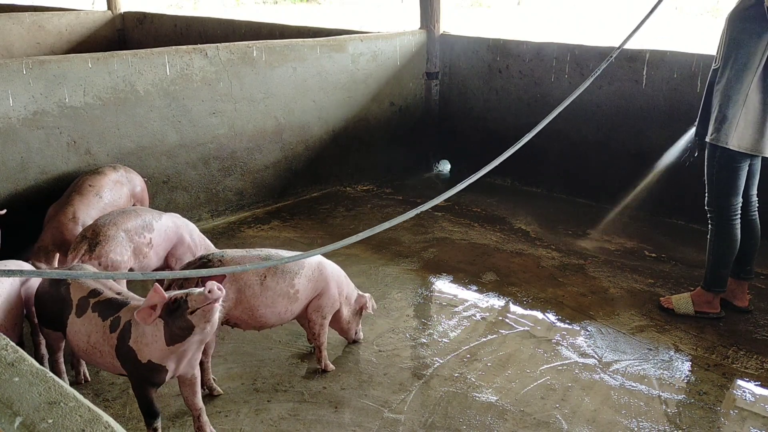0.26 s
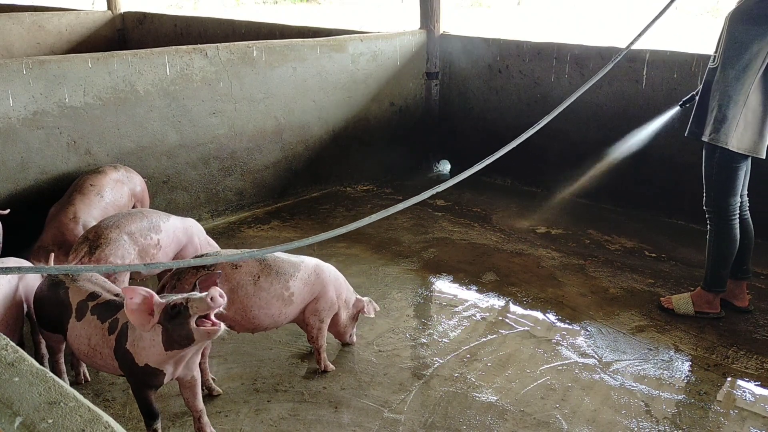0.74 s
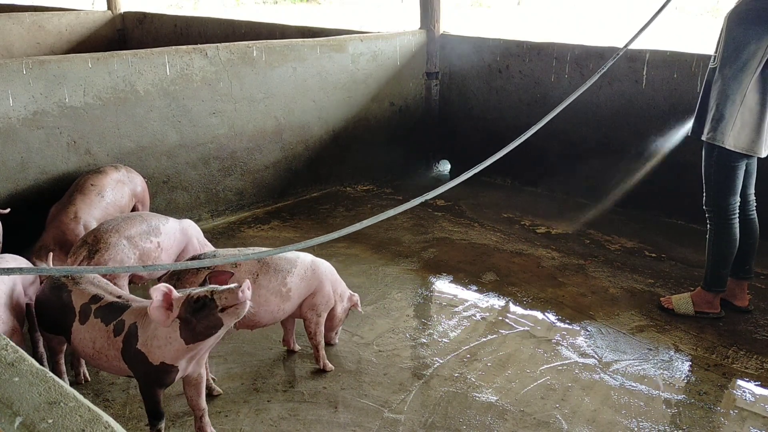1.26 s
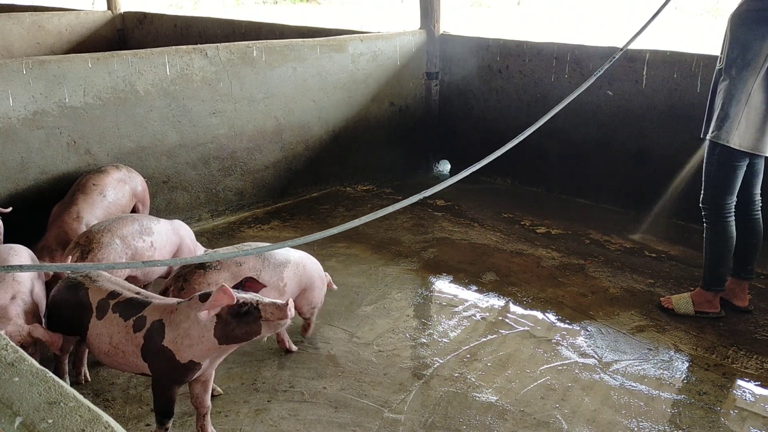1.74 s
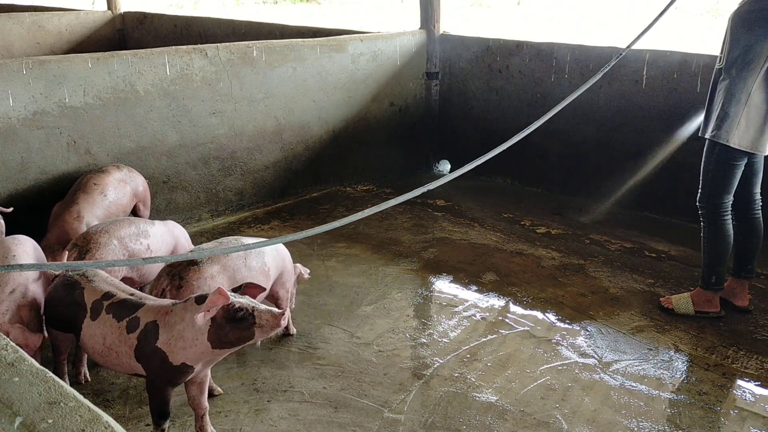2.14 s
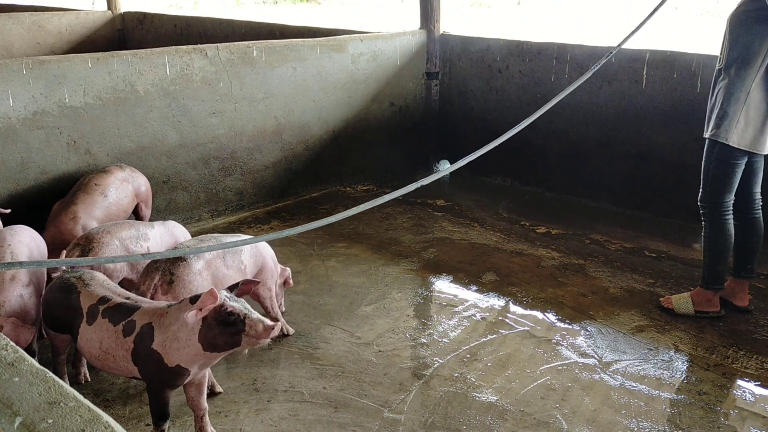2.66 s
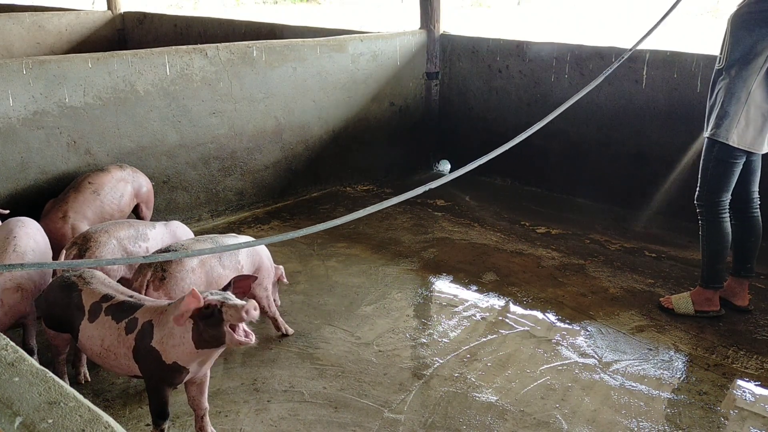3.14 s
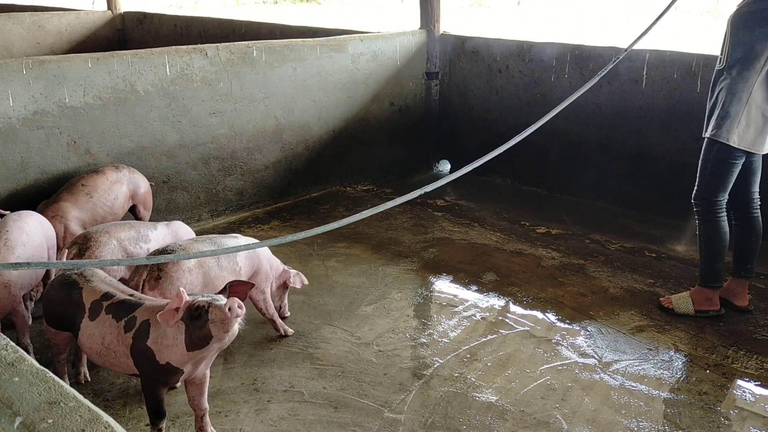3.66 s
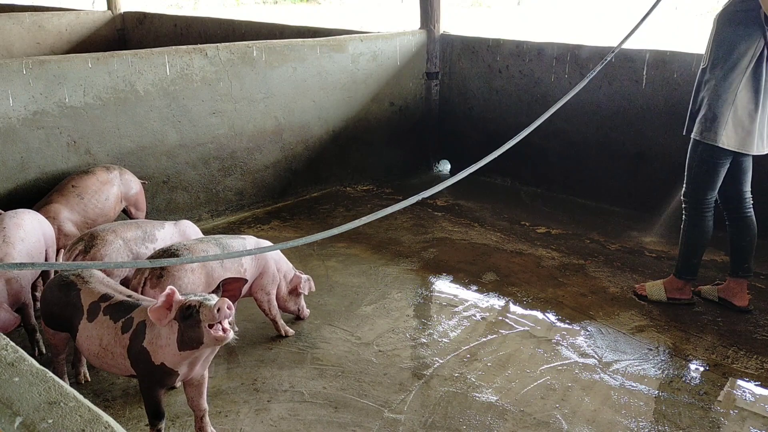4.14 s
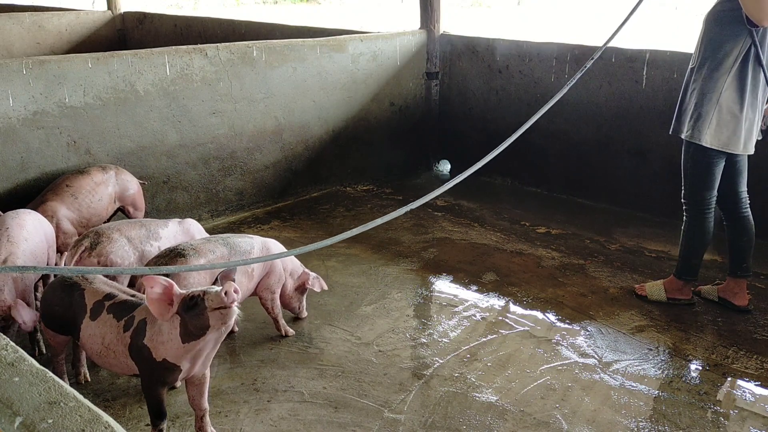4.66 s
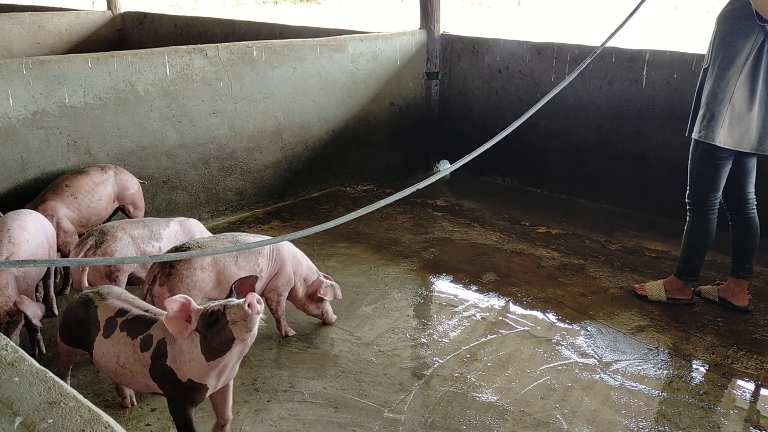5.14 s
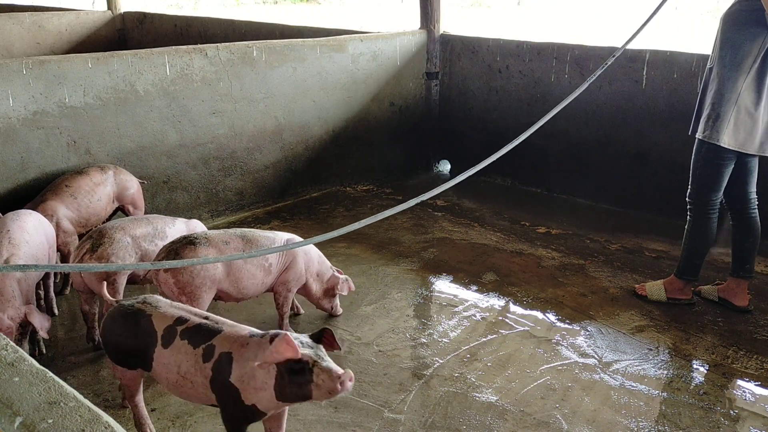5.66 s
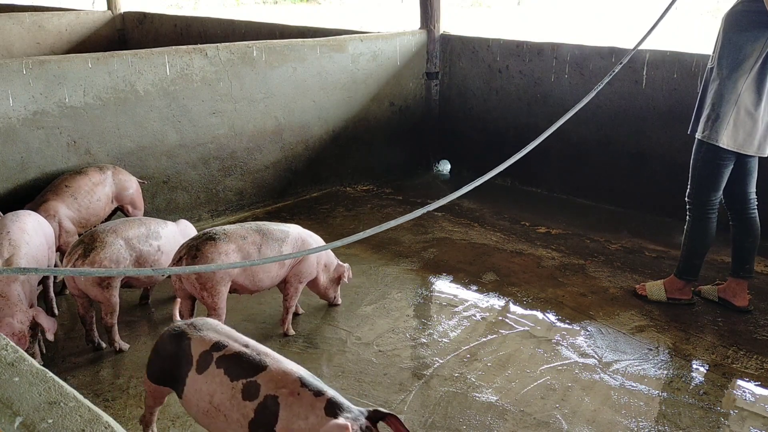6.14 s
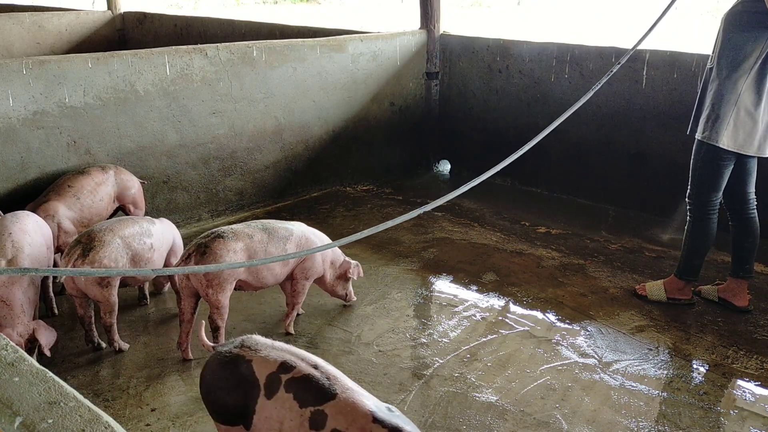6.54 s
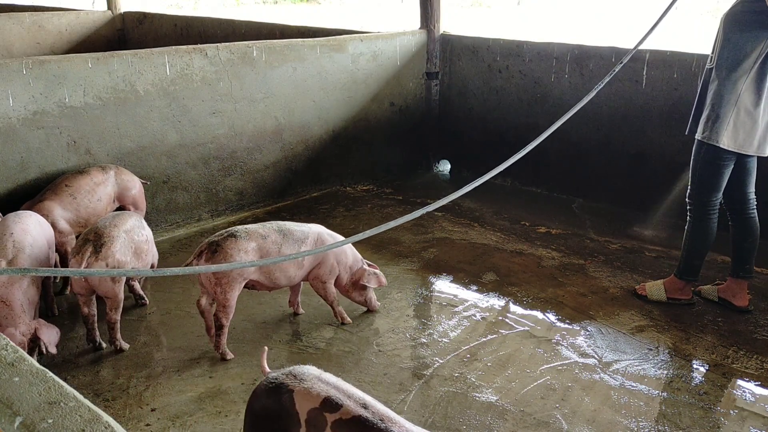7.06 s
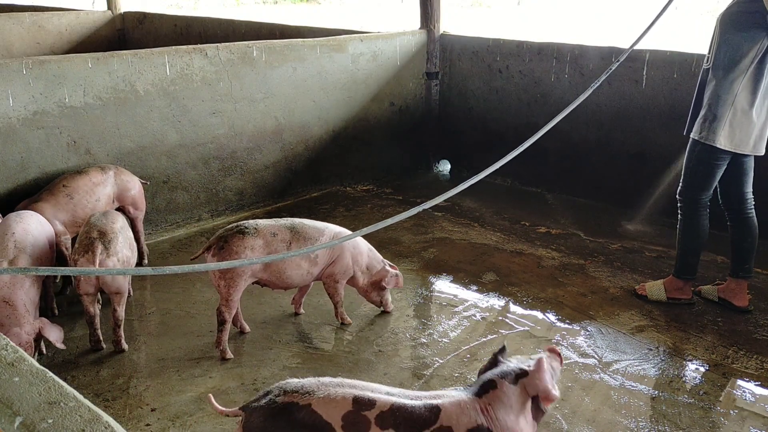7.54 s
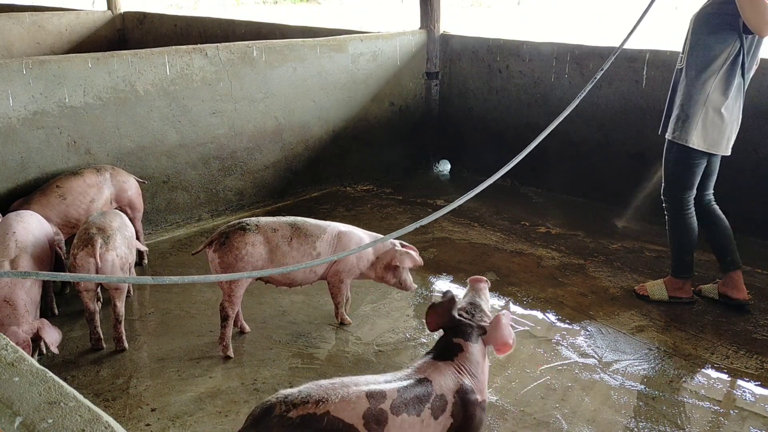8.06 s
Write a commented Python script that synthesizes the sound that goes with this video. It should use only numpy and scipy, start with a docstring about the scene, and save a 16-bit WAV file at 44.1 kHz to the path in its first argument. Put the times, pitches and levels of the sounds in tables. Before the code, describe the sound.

In a concrete pig pen, a pressure washer runs without a break: a buzzing, rattling plunger pump with a high steady whine, and a bright hissing water jet over it. The machine sags briefly a few times early, the level dips just past the middle, and two faint pig grunts come late. One fixed microphone, centred, with slight low air puffs.

```python
"""In a concrete pig pen, a pressure washer runs while its jet sweeps the wet floor.
The three-plunger pump repeats the same knocks at every turn of its motor; its housing whines on two
multiples of the motor speed. Filtered noise makes the machine's rush, the hissing, flaring jet and a low
rumble with a few puffs of air. Rough pulses through throat and snout resonances make two faint pig grunts.
The machine's sound sags a few times early on, and the level dips briefly past the middle."""
import sys
import numpy as np
from scipy import signal
from scipy.fft import rfft, irfft
from scipy.io import wavfile

SR = 44100
rng = np.random.default_rng(int(sys.argv[2]) if len(sys.argv) > 2 else 0)


def materialize(psi):
    """Save the field psi as 16-bit PCM at rate SR to the path in sys.argv[1].

    A 1-D psi becomes a single channel; in a 2-D psi each row is a channel.
    """
    bounded = np.clip(np.atleast_2d(psi).T, -1, 1)
    quanta = np.round(bounded * 32767).astype(np.int16)
    wavfile.write(sys.argv[1], SR, quanta)


N = 366030
TIME = np.arange(N) / SR  # seconds
BINS = np.fft.rfftfreq(N, 1 / SR)  # Hz


def gain_of(db):
    """Turns decibels into an amplitude factor."""
    return 10 ** (np.asarray(db) / 20)


def evened(x):
    """Scales a signal to an rms (average strength) of one."""
    return x / np.sqrt(np.mean(abs(x) ** 2) + 1e-20)


def read(points, hz):
    """Reads a spectrum in dB at any frequency, in straight lines over log frequency."""
    point_hz, point_db = np.transpose(points)
    return np.interp(np.log(hz + 1), np.log(point_hz + 1), point_db)


def follow(rows):
    """Draws each column of a table as a curve over time, one value per sample."""
    seconds, *columns = np.transpose(rows)
    return [np.interp(TIME, seconds, column) for column in columns]


def swells(rows):
    """Adds up a smooth rise and fall in dB for each row (middle, length, height)."""
    total_db = 0
    for middle, length, height_db in rows:
        position = np.clip((TIME - middle) / length, -.5, .5)
        total_db = total_db + height_db * np.cos(np.pi * position) ** 2
    return total_db


def colour(x, points):
    """Filters a sound by a spectrum, making some pitches louder than others."""
    return irfft(rfft(x) * gain_of(read(points, BINS)), N)


def resonate(x, hz, width):
    """Passes a sound through one resonance, half as strong one width away, and evens it."""
    response = 1 / (1 + ((BINS - hz) / width) ** 2)
    return evened(irfft(rfft(x) * response, N))


def wander(rate_hz, size=2048):
    """Makes a smooth random complex curve of rms one, moving up to about rate_hz."""
    hz = np.fft.fftfreq(size, N / SR / size)
    chance = rng.standard_normal(size) + 1j * rng.standard_normal(size)
    curve = np.fft.ifft(chance / (1 + (hz / rate_hz) ** 2))
    return np.interp(TIME, np.linspace(0, N / SR, size), evened(curve))


# How fast the motor shaft spins.
# Each row: time in seconds, speed in turns per second.
SHAFT_SPEED = [(0, 48.78), (2.6, 48.77), (4.1, 48.82), (6.2, 48.84), (8.3, 48.82)]


def shaft_angle(jitter=0.0017, jitter_hz=9):
    """The motor's angle in radians adds up its speed; the load shakes it slightly."""
    turning = 2 * np.pi * np.cumsum(follow(SHAFT_SPEED)[0]) / SR
    return turning + jitter * wander(jitter_hz).real


# Slow drift in the strength of the pump, before the pump's own trims.
# Each row: time in seconds, then thud, buzz, rattle and clatter in dB.
PUMP_DRIFT = [(0, -36, -33.5, -33.5, -31.5), (1.2, -36, -33, -34, -31.5), (3.1, -35, -33.5, -34.5, -31),
              (3.9, -37.2, -32.5, -37.5, -30.2), (4.9, -38.3, -33.7, -37, -32),
              (5.9, -38.5, -32, -34.5, -31), (8.3, -40, -33, -35.5, -31)]
# Short sags in the machine's sound.
# Each row: middle in seconds, length in seconds, depth in dB.
SAGS = [(.46, .2, 2), (1.44, 0.13, 2.5), (1.61, 0.35, 1.6), (2.53, 0.21, 2)]


def pump_gains():
    """Strength of thud, buzz, rattle and clatter over time; all four sag together."""
    return gain_of(np.array(follow(PUMP_DRIFT)) - swells(SAGS))


# Knocks within one turn of the shaft; they set the timing of the sound, not its loudness.
# Each row: place in the turn from 0 to 1, pitch in Hz, width in Hz, weight in dB.
KNOCKS = [(.83, 476, 270, -2.5), (.42, 450, 210, -13), (0.95, 934, 262, -2.5), (.5, 850, 166, -2.5),
          (.18, 1376, 514, -1.5), (.8, 1390, 510, -8), (.05, 2080, 590, -6.5), (.38, 2200, 650, -4),
          (.55, 1860, 750, -2.5), (.72, 2030, 970, -9)]


def knock_phase(orders, smear=1.23, scatter=0.19):
    """Each knock has its place in the turn, smeared over its band; the walls scatter the timing."""
    order_hz = orders * np.mean(follow(SHAFT_SPEED))
    arrival = scatter * (rng.standard_normal(len(orders)) + 1j * rng.standard_normal(len(orders)))
    for place, hz, width, db in KNOCKS:
        # the higher part of each knock comes later
        band = np.exp(-(1 + 1j * smear) * ((order_hz - hz) / width) ** 2)
        timing = np.exp(-2j * np.pi * (orders * place + rng.random()))
        arrival = arrival + gain_of(db) * band * timing
    return np.angle(arrival)


def revolve(angle, knocks, orders, db, flutter, drift, flutter_hz=11, drift_hz=0.53, count=3, size=8192):
    """One turn's sound, repeated; shifting echo paths make each order (shaft multiple) waver."""
    place = angle / (2 * np.pi) % 1 * size
    index = np.round(orders).astype(int)

    def repeat(phase):
        """Builds one turn from its orders and plays it again at every turn."""
        lines = np.zeros(size // 2 + 1, complex)
        lines[index] = gain_of(db) * np.exp(1j * phase)
        one_turn = irfft(lines) * size
        return np.interp(place, np.arange(size), one_turn)

    sound = repeat(knocks[index])
    for _ in range(count):
        shifting = (flutter * wander(flutter_hz) + drift * wander(drift_hz)).real
        echo = repeat(2 * np.pi * rng.random(len(orders)))
        sound = sound + shifting * np.sqrt(2 / count) * echo
    return evened(sound)


# The pump's sound from hum up to clatter; each group of rows is later set to its own level.
# Each row: multiple of the shaft speed, relative level in dB.
PUMP_ORDERS = [(1, -31), (2, -16.5), (3, -1), (4, -27), (5, -23.5), (6, -11.0), (7, -15.5), (8, -29.5),
               (9, 3), (10, -4.5), (11, -3.5), (12, -13.5), (13, -8), (14, -6.5), (15, -7), (16, -9),
               (17, -5.0), (18, -10), (19, -1.5), (20, -16), (21, -17.5), (22, -16.5), (23, -14.5),
               (24, -18), (25, -10.5), (26, -14.5), (27, -10.5), (28, -6), (29, -8.5), (30, -7),
               (31, -15.5), (32, -5.5), (33, -14), (34, -6.5), (35, -8.5), (36, -8), (37, -12.5), (38, -3),
               (39, -6.5), (40, -5.5), (41, -4), (42, -5.5), (43, 0), (44, -13), (45, -8.5), (46, -8.5),
               (47, -5.5), (48, -10), (49, -6.5), (50, -5.5), (51, -17), (52, -10.5), (53, -26)]
# Valve ticking, mostly above the whine.
# Each row: pitch in Hz, relative level in dB of each order there.
TICKING = [(2730, -10.5), (2870, -12.5), (2950, -15), (3250, -21.5), (3750, -22), (3950, -26.5),
           (4500, -23.5), (4800, -38), (5900, -59), (6700, -47), (8200, -24.5), (9500, -33)]
MAINS_HZ = 100


def pump(angle, hum_db=-38.0, thud_db=-0.4, buzz_db=-0.3, rattle_db=-1, clatter_db=-0.65,
         ticking_db=-6.5, mains_db=-56):
    """Plunger strokes hum, thud and buzz; valves rattle, clatter and tick less evenly; mains hums below."""
    thud_gain, buzz_gain, rattle_gain, clatter_gain = pump_gains()
    # groups: orders 1-7, 8-9, 10-20, 21-34 and 35-53
    groups = np.split(np.array(PUMP_ORDERS), [7, 9, 20, 34])
    hum, thud, buzz, rattle, clatter = (group.T for group in groups)
    fine = np.arange(56, 195)  # orders of the ticking
    fine_db = read(TICKING, fine * np.mean(follow(SHAFT_SPEED)))
    knocks = knock_phase(np.arange(fine[-1] + 1))  # all groups share the same knocks

    mix = gain_of(mains_db) * evened(np.sin(2 * np.pi * MAINS_HZ * TIME))
    mix += gain_of(hum_db) * revolve(angle, knocks, *hum, flutter=0.11, drift=0.046)
    mix += gain_of(thud_db) * thud_gain * revolve(angle, knocks, *thud, flutter=0.063, drift=0.033)
    mix += gain_of(buzz_db) * buzz_gain * revolve(angle, knocks, *buzz, flutter=0.13, drift=0.15)
    mix += gain_of(rattle_db) * rattle_gain * revolve(angle, knocks, *rattle, flutter=0.24, drift=0.37)
    mix += gain_of(clatter_db) * clatter_gain * revolve(angle, knocks, *clatter, flutter=0.33, drift=0.4)
    ticking = revolve(angle, knocks, fine, fine_db, flutter=0.63, drift=0.52)
    return mix + gain_of(ticking_db) * clatter_gain * ticking


# The whine passes slowly from its lower tone to both, before sags and echo.
# Each row: time in seconds, lower tone in dB, upper tone in dB.
WHINE_LEVELS = [(0, -32, -45), (.28, -28, -48), (.48, -31.5, -43), (.7, -28, -46), (1.02, -40, -37),
                (1.13, -29.8, -43), (2.1, -30.5, -46), (2.5, -34, -36), (3.15, -31, -41), (4.2, -34.5, -37),
                (4.65, -39, -37), (5.03, -42, -36.5), (5.22, -46, -44), (5.48, -33, -34.5), (6.1, -37, -39),
                (6.85, -34.5, -33.7), (7.45, -34, -37), (8.3, -34, -35.5)]
# The two whining tones, lower then upper, as multiples of the shaft speed.
WHINE_ORDERS = (54, 55)


def whine(angle, echo_db=(-41, -45), echo_hz=6):
    """Orders near a housing resonance sing out; a shifting echo makes each flutter, most when weak."""
    tones = 0
    for order, db, echo in zip(WHINE_ORDERS, follow(WHINE_LEVELS), echo_db):
        strength = gain_of(db) + gain_of(echo) * wander(echo_hz)
        tones = tones + strength * np.exp(1j * order * angle)
    return gain_of(-swells(SAGS)) * np.sqrt(2) * tones.real  # root 2 turns rms into peak


# Colour of the rush of the motor fan and the water in the pump.
# Each row: pitch in Hz, relative level in dB per Hz.
RUSH_COLOUR = [(60, -8), (150, 0.5), (330, -4.5), (480, 0.5), (800, 1), (1250, 0.5), (1600, 4.5),
               (2300, 3.5), (2800, 2), (3300, 2.5), (4200, -9.5), (6000, -12)]
# Housing resonances that ring within the rush.
# Each row: pitch in Hz, width in Hz, level in dB.
HOUSING = [(1044, 66, -43.5), (2135, 54, -49.5), (2593, 65, -41)]


def rush(angle, level_db=-35.0, throb=0.12, order=3):
    """Turbulence makes noise that surges with each plunger; added noise rings in the housing."""
    surge = 1 + throb * np.cos(order * angle)
    turbulence = colour(rng.standard_normal(N), RUSH_COLOUR)
    noise = gain_of(level_db) * evened(turbulence * surge)
    for hz, width, db in HOUSING:
        noise = noise + gain_of(db) * resonate(rng.standard_normal(N), hz, width)
    return noise * evened(pump_gains()[-1])  # swells and sags like the clatter


# The jet as it sweeps the floor, before wavering, sags, flares and the recorder's band limit.
# Each row: time in seconds, hiss in dB, mist fizz in dB.
JET_SWEEP = [(0, -37.7, -29), (1.7, -37.5, -30), (2.1, -36.5, -28.3), (3.2, -37, -27.5), (3.6, -38, -29),
             (4.7, -37, -29), (5.3, -37.5, -30), (5.7, -36.5, -28), (6.6, -37.5, -29), (8.3, -37.5, -29.5)]
# Colour of the jet; hiss and fizz are later set to their own levels.
# Each row: pitch in Hz, relative level in dB per Hz.
SPRAY_COLOUR = [(500, -12), (3000, -9), (5900, -8.3), (7000, -5), (8150, -.6), (8900, -2.7), (9400, -2.3),
                (9750, -5.2), (10700, -5.8), (11300, -1.6), (11850, -6), (13000, -5.2), (14850, -1.3),
                (15300, 2.8)]
# The mist flares up or thins for a moment.
# Each row: middle in seconds, length in seconds, change in dB.
FLARES = [(.25, .14, 1), (.39, .12, 1), (1.54, .2, 2.5), (2.46, .1, 2), (4.89, .24, 2.5), (5.46, .12, -5),
          (5.58, .14, 2)]


def jet(angle, throb=0.031, drops_per_s=2500, spatter=0.39, waver_db=0.48, waver_hz=6,
        sag_share=0.65, order=3):
    """Fine spray and single drops strike the concrete, a little harder at each plunger stroke."""
    drops = rng.standard_normal(N) * (rng.random(N) < drops_per_s / SR)
    stroke = 1 + throb * np.cos(order * angle)
    water = (rng.standard_normal(N) + spatter * evened(drops)) * stroke
    spray = rfft(colour(water, SPRAY_COLOUR))
    mist_share = 1 / (1 + (10000 / (BINS + 1)) ** 16)  # hiss below 10 kHz, mist fizz above
    hiss = evened(irfft(spray * (1 - mist_share), N))
    fizz = evened(irfft(spray * mist_share, N))
    hiss_db, fizz_db = follow(JET_SWEEP) + waver_db * evened(wander(waver_hz).real)
    hiss_gain = gain_of(hiss_db - sag_share * swells(SAGS))
    fizz_gain = gain_of(fizz_db + swells(FLARES))
    return hiss_gain * hiss + fizz_gain * fizz


# Colour of the low rumble.
# Each row: pitch in Hz, relative level in dB per Hz.
RUMBLE_COLOUR = [(8, -5), (20, 3), (45, -3), (80, -3), (130, -10), (300, -30), (900, -70)]
# Puffs of air on the microphone.
# Each row: middle in seconds, length in seconds, dB above the rumble.
GUSTS = [(2.59, .24, 9), (3.45, .16, 7), (6.99, .26, 9), (7.46, .18, 12), (7.83, .18, 16)]


def rumble(level_db=-57, stir_db=1.8, stir_hz=3):
    """Stirring air is low noise of wandering strength, with a few stronger puffs."""
    db = level_db + stir_db * evened(wander(stir_hz).real) + swells(GUSTS)
    return gain_of(db) * evened(colour(rng.standard_normal(N), RUMBLE_COLOUR))


# The pig's grunts.
# Each row: start in seconds, length in seconds, level in dB, pulses per second, mouth opening 0 to 1.
GRUNTS = [(6.83, 0.19, -37.5, 45, 0.7), (7.745, .14, -35.5, 64, 1)]
# Resonances of the pig's throat and snout, lowest first.
# Each row: pitch in Hz, width in Hz, relative level in dB.
SNOUT = [(276, 43, 0), (1030, 50, 5), (1910, 130, 5)]


def pig(rough=0.5):
    """Slow, rough pulses pass the snout; an open mouth lets the upper resonances out."""
    out = np.zeros(N)
    for start, length, db, rate, mouth in GRUNTS:
        swell = np.sin(np.pi * np.clip((TIME - start) / length, 0, 1))
        pulses = np.diff(np.floor(TIME * rate), prepend=0)
        drive = evened(pulses) + rough * rng.standard_normal(N)
        chest, *upper = (gain_of(level) * resonate(drive, hz, width) for hz, width, level in SNOUT)
        out += gain_of(db) * swell * evened(chest + mouth * sum(upper))
    return out


def scene():
    """Adds all the sounds at one microphone, alike in both channels."""
    angle = shaft_angle()
    mix = pump(angle) + whine(angle) + rush(angle) + jet(angle) + rumble() + pig()
    return np.array([mix, mix])


# The level dips briefly.
# Each row: time in seconds, depth from 0 to 1.
DIP = [(4.915, 0), (4.935, 1), (5.499, 1), (5.502, 0)]
# How much each pitch loses in the dip.
# Each row: pitch in Hz, change in dB at full depth.
DIP_COLOUR = [(100, -4.4), (3000, -4), (6000, -4), (9000, -2.5), (11500, 0)]
EDGE_HZ = 15520  # upper limit of the recorder


def record(dry):
    """The level dips briefly, the treble least; then the recorder's steep filter limits the band."""
    depth = follow(DIP)[0]
    dipped = (1 - depth) * dry + depth * colour(dry, DIP_COLOUR)
    band_limit = signal.firwin(1023, EDGE_HZ, window=("kaiser", 9), fs=SR)
    return signal.oaconvolve(dipped, band_limit[None], "same")


dry = scene()
out = record(dry)
materialize(out)
```